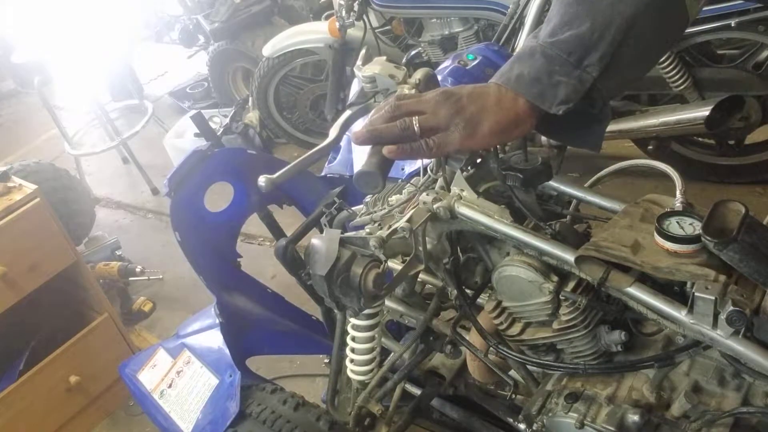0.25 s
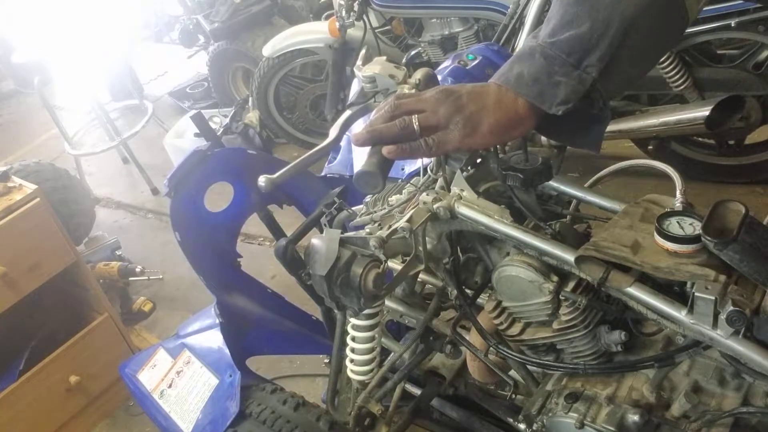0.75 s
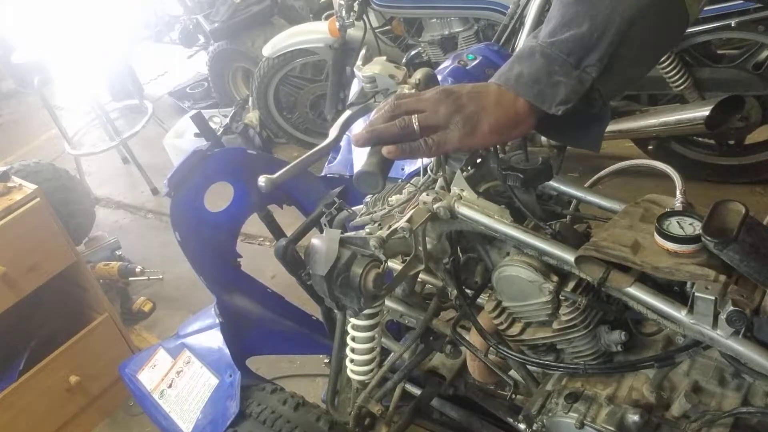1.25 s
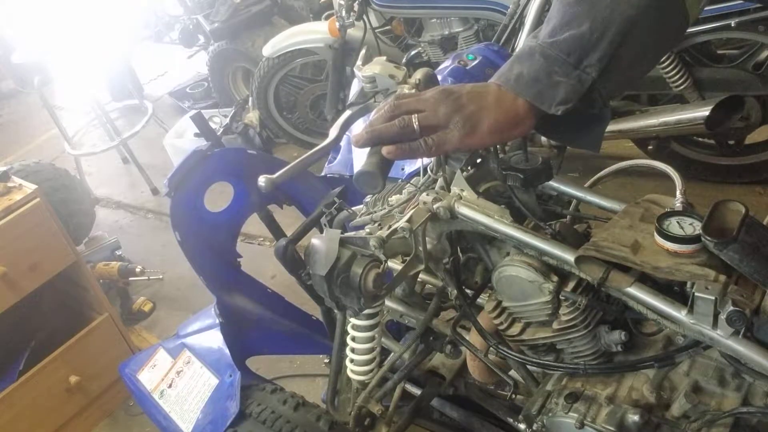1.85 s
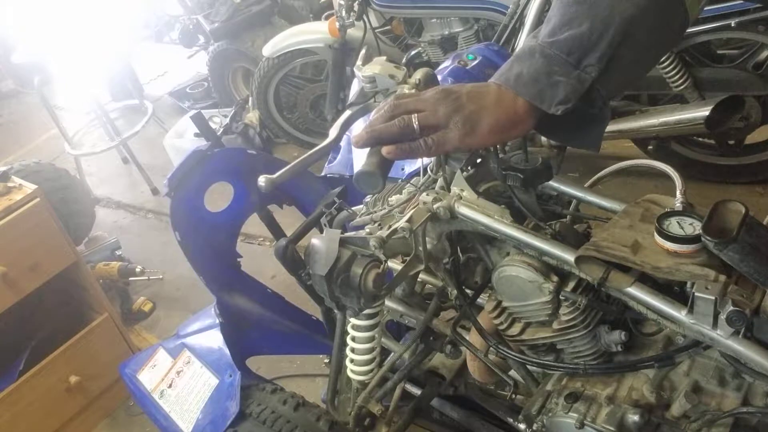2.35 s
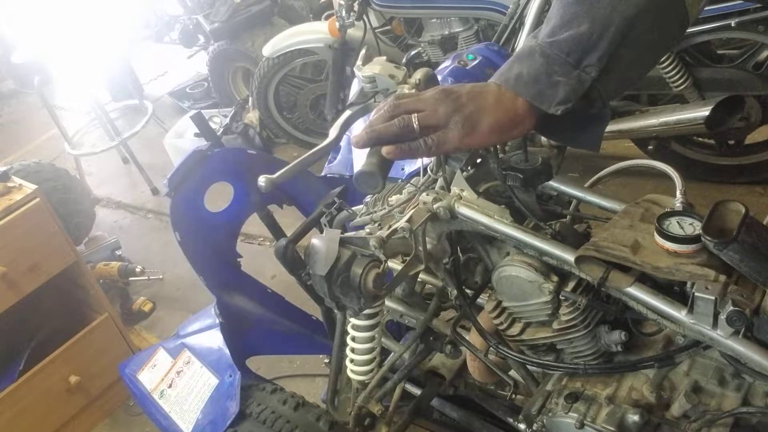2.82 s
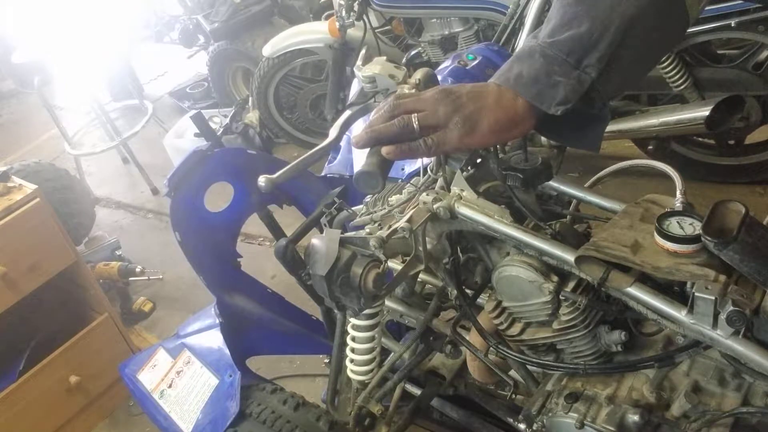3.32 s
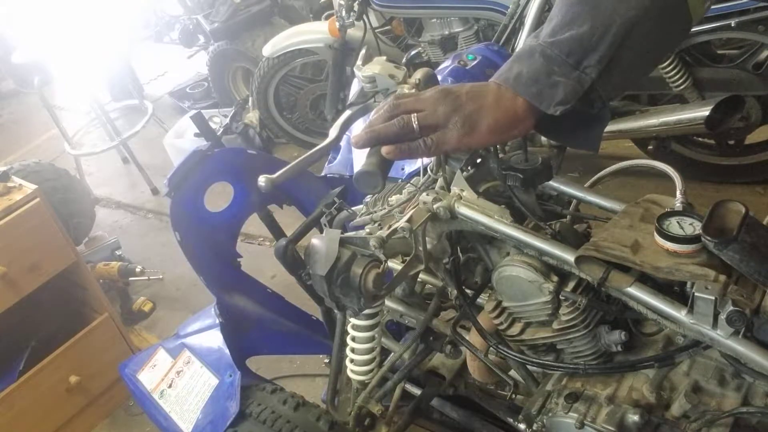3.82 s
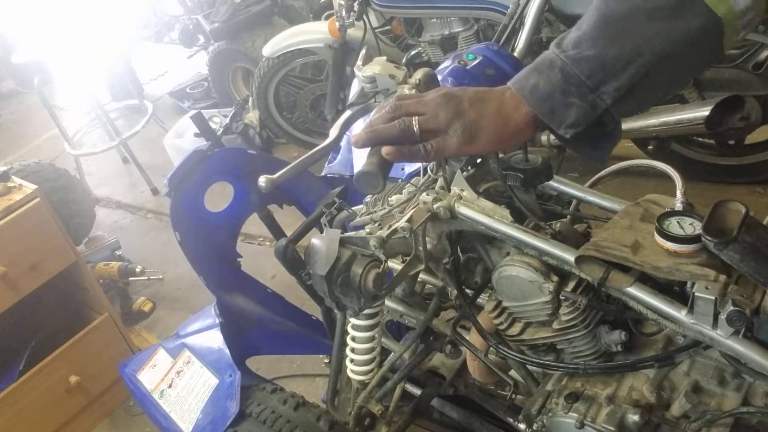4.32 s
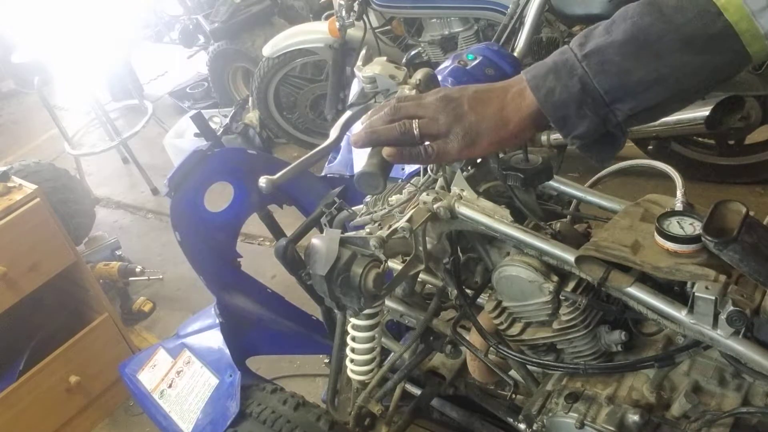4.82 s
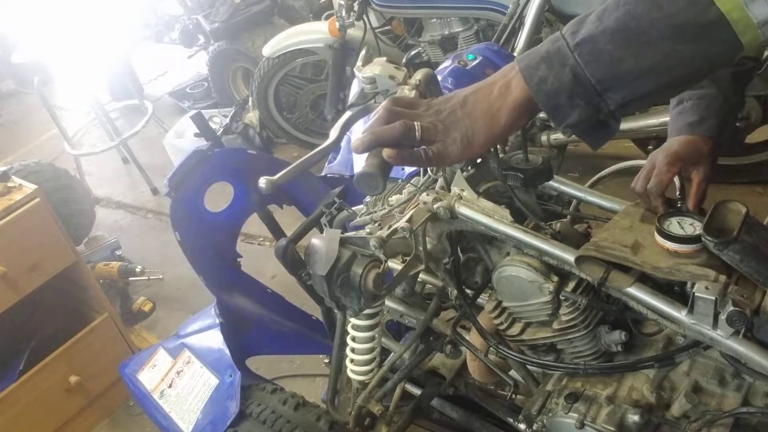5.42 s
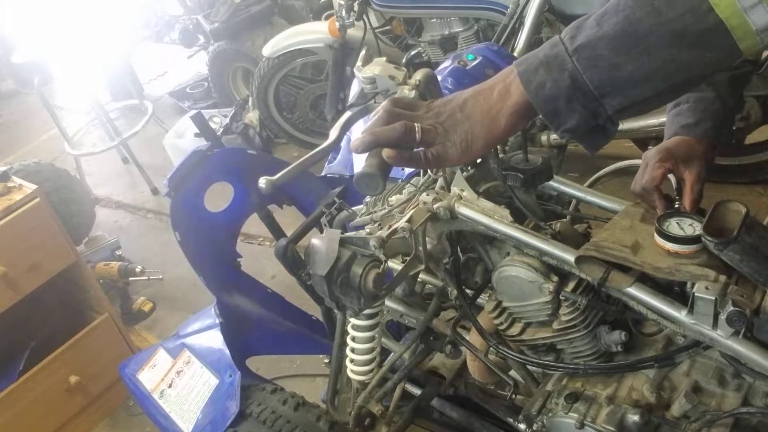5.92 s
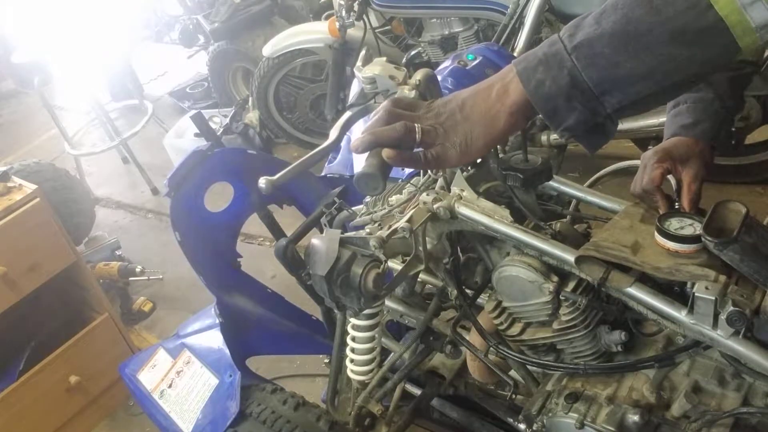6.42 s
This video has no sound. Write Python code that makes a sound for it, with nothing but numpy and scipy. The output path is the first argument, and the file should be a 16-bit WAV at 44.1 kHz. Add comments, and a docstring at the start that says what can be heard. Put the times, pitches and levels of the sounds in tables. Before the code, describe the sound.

An electric starter cranks a single-cylinder engine in even, clattering, thumping pulses without firing, whirrs down and groans, then a gauge vents a short puff of air.

```python
"""Compression test in a workshop: an electric starter cranks a single-cylinder engine, with no firing.
A burst of cranking dies away in boom and ringing steel; a relay clacks and a long burst follows. In every cycle
the gears slam into load, the frame thumps at the top of compression and the drive rebounds and rattles.
The starter whirrs down, a last stroke groans, the gauge leaks in spurts and its valve vents the air in one puff.
Gears, contacts and air are shaped noise or blows through resonances; thumps and steel are decaying sines."""
import sys
import numpy as np
from scipy import signal
from scipy.fft import rfft, irfft, next_fast_len
from scipy.io import wavfile
from scipy.ndimage import map_coordinates

SR = 44100
rng = np.random.default_rng(int(sys.argv[2]) if len(sys.argv) > 2 else 0)


def dump_mix(stems):
    """Bounce the given channels to the path in sys.argv[1] as a 16-bit WAV at rate SR."""
    frames = np.atleast_2d(stems).T  # one column per channel
    limited = np.clip(frames, -1, 1)  # hard clip at full scale
    pcm = np.round(limited * 32767).astype(np.int16)
    wavfile.write(sys.argv[1], SR, pcm)


N = 293706
T = np.arange(N) / SR


def amp(db):
    """Decibels to gain."""
    return 10 ** (np.asarray(db) / 20)


def unit(x):
    """Scale to rms 1."""
    return x / np.sqrt(np.mean(np.abs(x) ** 2) + 1e-20)


def along(points, hz):
    """Read (frequency [Hz], value) points on a log frequency axis."""
    f, v = np.transpose(points)
    return np.interp(np.log(hz + 1), np.log(f + 1), v)


def wobble(rate_hz):
    """Smooth random curve with rate_hz knots a second."""
    knots = rng.standard_normal(int(N * rate_hz / SR) + 4)
    return map_coordinates(knots, [T * rate_hz])


def burst(t, rise_s, length_s, t60_s):
    """Envelope that rises from t = 0, holds until length_s and dies away."""
    attack = np.clip(t / (rise_s + 1e-6), 0, 1)
    return attack * amp(-60 * np.maximum(t - length_s, 0) / t60_s)


def running_out(start_s, length_s):
    """Share left of something that drains evenly from start_s on."""
    return np.clip(1 - (T - start_s) / length_s, 0, 1)


def filtered(x, response):
    """Filter x by a complex response of frequency."""
    size = 2 * next_fast_len((N + SR) // 2)
    spectrum = rfft(x, size) * response(np.fft.rfftfreq(size, 1 / SR))
    return irfft(spectrum, size)[..., :x.shape[-1]]


def colour(x, points, peaks=()):
    """Minimum-phase filter of unit power gain: a broad spectrum with resonances standing out of it."""
    def response(hz):
        db = along(points, hz)
        for centre_hz, width_hz, lift_db in peaks:
            db = db + lift_db / (1 + (2 * (hz - centre_hz) / width_hz) ** 2)
        # fold the cepstrum to make the filter causal
        cepstrum = irfft(np.log(amp(db)))
        half = len(cepstrum) // 2
        cepstrum[1:half] *= 2
        cepstrum[half + 1:] = 0
        return unit(np.exp(rfft(cepstrum)))
    return filtered(x, response)


def ring(x, modes):
    """Damped resonances, together of unit power gain; a wider mode dies sooner."""
    t = T[:SR // 2]
    tone = 0
    for hz, width_hz, db in modes:
        decay = np.exp(-np.pi * width_hz * t)
        tone = tone + amp(db) * width_hz * decay * np.sin(2 * np.pi * (hz * t + rng.random()))
    return signal.fftconvolve(x, tone / np.linalg.norm(tone))[:N]


def narrow(hz, width_hz):
    """Noise of rms 1 in a narrow band around a steady or gliding pitch."""
    envelope = wobble(width_hz) + 1j * wobble(width_hz)
    carrier = np.exp(2j * np.pi * np.cumsum(hz * np.ones(N)) / SR)
    return unit((envelope * carrier).real)


def impulses(times_s, sizes):
    """Single-sample blows."""
    index = np.clip(np.round(times_s * SR).astype(int), 0, N - 1)
    return np.bincount(index, sizes, N)


def teeth(rate_hz, scatter_db, rub):
    """Uneven random tooth contacts over sliding noise, rms 1."""
    size_db = scatter_db * np.clip(rng.standard_normal(N), -2, 2)
    hits = (rng.random(N) < rate_hz / SR) * amp(size_db) * rng.choice([-1, 1], N)
    return unit(unit(hits) + rub * rng.standard_normal(N))


# likeness of a diffuse field at both ports: (frequency [Hz], likeness [0-1])
PORT_LIKENESS = [(60, 0.6), (150, .95), (280, .88), (520, 0.7), (1000, .05), (3000, 0.02)]


def pair(noises):
    """Two unrelated signals as a diffuse field at two close ports, most alike in the bass."""
    def mid_side(hz):
        turn = np.arccos(np.clip(along(PORT_LIKENESS, hz), -1, 1)) / 2
        return np.array([np.cos(turn), np.sin(turn)])
    mid, side = filtered(noises, mid_side)
    return np.array([mid + side, mid - side])


# background spectrum: (frequency [Hz], relative level [dB])
BACKGROUND_COLOUR = [(13, -35), (22, -11.5), (44, -7), (66, -1), (133, -15.5), (190, -25), (408, -35.5),
                     (1010, -37.5), (3430, -39), (4050, -27), (4390, -52.5), (5170, -45.5), (5770, -38),
                     (7580, -42), (15000, -42)]


def background(level_db=-63.5):
    """Low rumble: steady coloured noise, diffuse at the two ports."""
    return amp(level_db) * unit(pair(colour(rng.standard_normal((2, N)), BACKGROUND_COLOUR)))


# engine cycles: (top of compression [s], relative strength of slam [dB], rebound [dB], overrun rattle [dB])
CYCLES = [(0.625, -4.5, -7.5, 1.5), (0.9264, 0, 1, -.5), (1.2453, -1.5, -.5, -.5), (1.562, -1, 0, 1),
          (1.8801, -0.5, -2, 0), (2.197, -0.5, -0.5, 1), (2.5152, 0, -1, 1), (2.835, 0, 1.5, 1),
          (3.1553, -0.5, 0.5, 2), (3.4742, 0, -0.5, -.5), (3.7927, -.5, -1, -1), (4.1115, -1.5, 2, -0.5),
          (4.4304, -1.5, 0, -1.5)]
EARLIER_TOP_S = -.05  # last compression of the earlier burst, still booming
THUMP_DB, THUMP_RISE_DB_PER_S, THUMP_FALL_DB_PER_S = -24, 400.5, 350.5
# pitch glides up as the piston goes over the top
THUMP_LOW_HZ, THUMP_HIGH_HZ, THUMP_GLIDE_S, THUMP_LEAD_S = 46.5, 72.1, 0.015, .008
BOOM_DB, BOOM_SWELL_S, BOOM_T60_S = -34.5, .06, .55


def thumps():
    """Each compression rocks the frame on its springs, and the bass hangs on in the room."""
    t = np.arange(-SR // 12, SR // 4) / SR
    glide = (1 + np.tanh((t + THUMP_LEAD_S) / THUMP_GLIDE_S)) / 2
    hz = THUMP_LOW_HZ + (THUMP_HIGH_HZ - THUMP_LOW_HZ) * glide
    rock = amp(THUMP_DB + np.minimum(THUMP_RISE_DB_PER_S * t, -THUMP_FALL_DB_PER_S * t))
    boom = amp(BOOM_DB) * burst(t, BOOM_SWELL_S, BOOM_SWELL_S, BOOM_T60_S)
    turns = np.cumsum(hz) / SR
    turns = turns - np.interp(0, t, turns)
    swing = -np.hypot(rock, boom) * np.cos(2 * np.pi * turns) * signal.windows.tukey(len(t), .1)
    tops_s = [EARLIER_TOP_S] + [row[0] for row in CYCLES]
    return sum(np.interp(T - top_s, t, swing) for top_s in tops_s)


# steel part still singing from the earlier burst: (frequency [Hz], relative level [dB], T60 [s])
STEEL_MODES = [(915, -57.5, 2.4), (2853, -70.5, 1.6)]


def steel():
    """A steel part rings out as decaying sines."""
    return sum(amp(db - 60 * T / t60_s) * np.sin(2 * np.pi * hz * T) for hz, db, t60_s in STEEL_MODES)


# gear loads in a cycle, slam, rebound, overrun: (time from top [s], rise [s], hold [s], T60 [s],
# relative clatter [dB], clutch ring [dB], idler ring [dB])
LOADS = [(-.118, .003, 0.021, 0.15, -17.5, -25.5, -21.5), (0.0122, 0.0016, .009, .11, -19.5, -25, -29),
         (0.065, .007, .053, .08, -23.5, -29, -25.5)]
RING_FALL = 2.6  # clutch and idler ring fade this many times faster than the clatter
RUN_DB, RUN_RING_DB = -31, -53.5  # steady clatter and ring between loads, relative
DRIVE_S, DRIVE_RISE_S, DRIVE_HOLD_S, DRIVE_T60_S = .45, .08, 4.05, .15


def loads():
    """Strength of clatter, clutch ring and idler ring: a steady drive with three loads in every cycle."""
    cycles = np.array(CYCLES)
    cycle = np.searchsorted(cycles[:, 0] + LOADS[0][0], T) - 1
    cycle = np.clip(cycle, 0, len(cycles) - 1)
    drive = burst(T - DRIVE_S, DRIVE_RISE_S, DRIVE_HOLD_S, DRIVE_T60_S)
    power = (amp([[RUN_DB], [RUN_RING_DB], [RUN_RING_DB]]) * drive) ** 2
    for (delay_s, rise_s, hold_s, t60_s, *parts_db), strength_db in zip(LOADS, cycles[:, 1:].T):
        t = T - cycles[cycle, 0] - delay_s
        strength = amp(strength_db)[cycle]
        clatter = burst(t, rise_s, rise_s + hold_s, t60_s)
        ringing = burst(t, rise_s, rise_s + hold_s, t60_s / RING_FALL)
        shapes = np.array([clatter, ringing, ringing])
        power = power + (amp(parts_db)[:, None] * strength * shapes) ** 2
    return np.sqrt(power)


# unloaded gears spinning up or coasting: (time [s], length [s], relative clatter [dB], clutch ring [dB])
SURGES = [(-.02, 0.076, -23.5, -42), (0.361, .036, -35, -52), (.394, 0.062, -25.5, -38),
          (0.471, .048, -21, -25.5), (4.668, 0.036, -29, -46), (4.805, 0.038, -39.5, -50.5)]
SURGE_RISE_S, SURGE_T60_S = 0.011, 0.15
# broad colour of the engine: (frequency [Hz], relative level [dB])
CASE_COLOUR = [(53, -33.5), (90, -16.5), (170, -14.5), (365, -6), (490, -10), (800, -4), (1070, -1.5),
               (1350, -8), (1650, -2.5), (2230, -8), (2600, -4), (3900, -10), (4500, -13.5), (5500, -21),
               (7800, -18), (8660, -25.5), (15500, -30.5)]
# resonances of cases and fins: (frequency [Hz], width [Hz], lift above broad colour [dB])
FIN_MODES = [(157.3, 5.8, 9), (200.5, 14, 6), (375, 69, 3.5), (693, 14, 2.5), (750, 21, 1.5),
             (782, 14, 0.5), (896, 26, 3), (1022, 16, 1), (1120, 21, -0.5), (1150, 33, 2.5),
             (1541, 35, 5.5), (1640, 30, 0), (1668, 36, 3), (1860, 16, 2.5), (1964, 9, 5.5), (2068, 78, 4),
             (2620, 9.4, 0.5), (2614, 16, 6), (2820, 8, -2.5), (3022, 13, 0.5), (2985, 26, 3.5),
             (3820, 180, 2.5), (3790, 35, 3.5), (4260, 30, 1.5), (6270, 33, 7)]
# steel starter clutch: (frequency [Hz], width [Hz], relative level [dB])
CLUTCH_MODES = [(6450, 63, -2.5), (7621, 160, -2), (7548, 163, -2), (7840, 300, -11.5)]
# starter idler gear: (frequency [Hz], width [Hz], relative level [dB])
IDLER_MODES = [(1040, 37, -3), (1102, 22, -4.5), (1154, 24, -8.5), (1643, 25, -6.5), (2414, 16, -6.5)]
# frame trembling as the engine turns: (frequency [Hz], relative level [dB])
SHAKE_COLOUR = [(15, -12), (30, -9.5), (60, 1), (110, 1.5), (180, -19), (400, -64)]


def gears(case_db=2.5, free_idler_db=-12, shake_db=-22):
    """The gear train clatters as hard as it is loaded; cases, idler gear and clutch ring with it."""
    on_teeth, on_clutch, on_idler = loads()
    free, free_clutch = sum(amp(parts_db)[:, None] * burst(T - s, SURGE_RISE_S, length_s, SURGE_T60_S)
                            for s, length_s, *parts_db in SURGES)
    effort = np.hypot(on_teeth * amp(wobble(40) / 2), free)
    clatter = colour(effort * teeth(rate_hz=900, scatter_db=3.5, rub=0.51), CASE_COLOUR, FIN_MODES)
    rollers = teeth(rate_hz=700, scatter_db=2.5, rub=.35)
    clutch = ring((on_clutch + free_clutch) * rollers, CLUTCH_MODES)
    idler_teeth = teeth(rate_hz=530, scatter_db=4.0, rub=0.38)
    idler = ring((on_idler + amp(free_idler_db) * free) * idler_teeth, IDLER_MODES)
    shake = colour(effort * rng.standard_normal(N), SHAKE_COLOUR)
    return amp(case_db) * clatter + clutch + idler + amp(shake_db) * shake


# gear lash and valve contacts of every cycle: (time from top [s], relative knock [dB], relative tick [dB])
CONTACTS = [(-.1145, 5, -17.5), (-.105, -2, -21.5), (-.097, 5.5, -17.5), (-.087, -4, -14), (-.042, -11, -5),
            (0.017, -4.5, -11), (0.056, -18, -5), (.076, 3.5, -5.5), (.098, -1, -6.5), (.122, 0, -5)]
# single clacks, starter relay first, then loose parts: (time [s], relative knock [dB], relative tick [dB])
CLACKS = [(.365, -4, -8), (.59, -25.5, -3), (0.669, -2, -1)]
# knock spectrum: (frequency [Hz], relative level [dB])
KNOCK_COLOUR = [(60, -21), (150, -16), (360, -1.5), (520, -7), (1050, 8.5), (2000, 0), (4000, 11.5),
                (9000, -38.5)]
# tick spectrum: (frequency [Hz], relative level [dB])
TICK_COLOUR = [(300, -21.5), (1500, -9), (3500, 9.5), (6000, 12), (11000, 8.5), (16000, -26.5)]


def knocks(knock_db=-1, tick_db=-1, jitter_s=.0008, scatter_db=1.9, tick_t60_s=.025):
    """Gear lash and valves strike near set times from each top, as hard as their load; clacks stand alone."""
    cycles = np.array(CYCLES)
    delay_s, heavy_db, light_db = np.transpose(CONTACTS)
    shape = (len(cycles), len(delay_s))
    times_s = (cycles[:, :1] + delay_s + jitter_s * rng.standard_normal(shape)).ravel()
    load = np.maximum(np.searchsorted(np.array(LOADS)[:, 0], delay_s), 1)
    force_db = cycles[:, load] + scatter_db * rng.standard_normal(shape)
    clack_s, clack_db, click_db = np.transpose(CLACKS)
    blows = impulses(times_s, amp(heavy_db + force_db + knock_db).ravel())
    blows = blows + impulses(clack_s, amp(clack_db))
    ticks = impulses(times_s, amp(light_db + force_db + tick_db).ravel())
    ticks = ticks + impulses(clack_s, amp(click_db))
    t = T[:SR // 20]
    crack = rng.standard_normal(len(t)) * amp(-60 * t / tick_t60_s)
    cracks = signal.fftconvolve(ticks, crack / np.linalg.norm(crack))[:N]
    return colour(blows, KNOCK_COLOUR, FIN_MODES) + colour(cracks, TICK_COLOUR)


# colour of the starter whirr: (frequency [Hz], relative level [dB])
BRUSH_COLOUR = [(200, -26.5), (550, -6), (850, -4.5), (1350, -0.5), (2000, 0.5), (2600, -11), (3400, -7),
                (3900, -3.5), (4400, -16.5), (8000, -27.5), (15000, -35)]
RUNDOWN_S, RUNDOWN_LENGTH_S, WHIRR_RISE_S = 4.547, 0.57, 0.07
WHIRR_DB, WHIRR_POWER = -32.5, 0.83


def rundown():
    """The undriven starter slows evenly; the level of its whirr goes with a power of its speed."""
    speed = running_out(RUNDOWN_S, RUNDOWN_LENGTH_S)
    attack = np.clip((T - RUNDOWN_S) / WHIRR_RISE_S, 0, 1)
    whirr = colour(teeth(rate_hz=700, scatter_db=3.5, rub=0.76), BRUSH_COLOUR)
    return amp(WHIRR_DB) * attack * speed ** WHIRR_POWER * whirr


# groan resonances: (frequency [Hz], width [Hz], relative level [dB])
GROAN_MODES = [(202, 24, -8), (362, 38, -5), (547, 75, -13.5)]
GROAN_S, GROAN_RISE_S, GROAN_HOLD_S, GROAN_T60_S, GROAN_DB = 4.705, 0.027, 0.043, .16, -30


def groan():
    """The last slow stroke groans: a noise burst through low resonances."""
    push = amp(GROAN_DB) * burst(T - GROAN_S, GROAN_RISE_S, GROAN_HOLD_S, GROAN_T60_S)
    return ring(push * rng.standard_normal(N), GROAN_MODES)


# engine settling and a touch on the gauge: (time [s], frequency [Hz], width [Hz], relative level [dB])
TAPS = [(5.165, 1000, 700, -52), (5.538, 590, 400, -70)]
TAP_RISE_S, TAP_T60_S = .006, 0.067


def taps():
    """Soft, dull knocks: short bursts of band noise without a ring."""
    return sum(amp(db) * burst(T - s, TAP_RISE_S, TAP_RISE_S, TAP_T60_S) * narrow(hz, width_hz)
               for s, hz, width_hz, db in TAPS)


# spurts of the leak: (time [s], length [s], relative whistle [dB], relative fizz [dB])
SPURTS = [(5.217, .12, -85, -74), (5.37, .09, -73.5, -78), (5.58, 0.098, -73.5, -77.5), (5.7, .1, -80, -75),
          (5.81, .1, -73, -79.5), (6.295, .4, -69.5, -100)]
# fizz of the leak: (frequency [Hz], relative level [dB])
FIZZ_COLOUR = [(3000, -23), (4600, -6), (5140, 7), (5600, -5), (6240, -1.5), (7500, -18), (12000, -23.5)]
SPURT_RISE_S, SPURT_T60_S = 0.035, .25
WHISTLE_HZ, SAG_S, SAG_HZ_PER_S = 4100, 6.33, 1400  # the whistle sinks once the gauge is empty


def leak(flutter_db=5, skirt_db=-6):
    """Trapped air whistles and fizzes in fluttering spurts through a small leak."""
    hz = WHISTLE_HZ - SAG_HZ_PER_S * np.maximum(T - SAG_S, 0)
    whistle = narrow(hz, width_hz=320) + amp(skirt_db) * narrow(hz, width_hz=1800)
    fizz = colour(rng.standard_normal(N), FIZZ_COLOUR)
    air = 0
    for s, length_s, whistle_db, fizz_db in SPURTS:
        spurt = burst(T - s, SPURT_RISE_S, length_s, SPURT_T60_S)
        air = air + spurt * (amp(whistle_db) * whistle + amp(fizz_db) * fizz)
    return air * amp(flutter_db * wobble(25) - 0.5)


# jet spectrum: (frequency [Hz], relative level [dB])
JET_COLOUR = [(59, -60), (100, -27), (370, -12), (447, -16.5), (508, -8), (1160, -9.5), (1260, -11.5),
              (1800, -6.5), (2630, -9), (5400, -2), (9340, -6.5), (12300, -2.5), (15500, -7)]
RELEASE_S, RELEASE_RISE_S, EMPTY_S, JET_DB, JET_POWER = 5.957, .008, .37, -26, 1.54
POP_DB, POP_T60_S, CRACK_LEAD_S, CRACK_DB = -24, 0.057, .02, -41


def gauge(dulling_per_s=2.5):
    """The valve cracks open, pops and vents; pressure drains evenly, the jet goes with its power and dulls."""
    t = T - RELEASE_S
    pressure = running_out(RELEASE_S, EMPTY_S)
    flow = amp(JET_DB) * np.clip(t / RELEASE_RISE_S, 0, 1) * pressure ** JET_POWER
    pop = amp(POP_DB) * burst(t, RELEASE_RISE_S, RELEASE_RISE_S, POP_T60_S)
    crack = amp(CRACK_DB) * burst(t + CRACK_LEAD_S, CRACK_LEAD_S, CRACK_LEAD_S, POP_T60_S)
    jet = (np.hypot(flow, pop) + crack) * colour(rng.standard_normal(N), JET_COLOUR)
    treble = filtered(jet, lambda hz: hz ** 2 / (hz ** 2 + 7000 ** 2))
    # treble starts lifted and ends cut
    return jet + (np.exp(-dulling_per_s * np.maximum(t, 0)) - .77) * treble


# workshop reverberation: (frequency [Hz], T60 [s])
ROOM_T60 = [(100, 0.55), (260, 0.7), (700, 0.44), (1840, 0.46), (4850, 0.35), (12800, 0.47)]


def echoes(early_db):
    """Two-channel response: quick echoes off nearby parts, then the room's tail."""
    hz, t, z = signal.stft(rng.standard_normal((2, SR * 3 // 5)), SR, nperseg=256)
    decay = amp(-60 * t / along(ROOM_T60, hz)[:, None])
    build_up = 1 - np.exp(-t / 0.0051)
    tail = signal.istft(z * decay * build_up, SR, nperseg=256)[1]
    early = rng.standard_normal(tail.shape) * amp(-60 * T[:tail.shape[1]] / 0.045)
    return tail / np.linalg.norm(tail[0]) + amp(early_db) * early / np.linalg.norm(early[0])


def workshop(x, direct_db, early_db, lead_s, block=14000):
    """Direct sound (left port ahead by lead_s) and echoes drawn anew for each block of samples."""
    # echoes are redrawn for each block, so random peaks average out and the typed resonances set the colour
    wet = np.zeros((2, 2 * N))
    for start in range(0, N, block):
        answer = signal.fftconvolve(x[None, start:start + block], echoes(early_db), axes=1)
        wet[:, start:start + answer.shape[1]] += answer
    ports = np.array([[1], [-1]])
    direct = filtered(x, lambda hz: np.exp(1j * np.pi * hz * lead_s * ports))
    total = np.sqrt(1 + amp(direct_db) ** 2 + amp(early_db) ** 2)
    return (amp(direct_db) * direct + pair(wet[:, :N])) / total


def scene():
    """Engine and gauge in the workshop, with frame thumps and a low background rumble."""
    machine = steel() + gears() + knocks() + rundown() + groan()
    engine = workshop(machine, direct_db=-4.0, early_db=-0.5, lead_s=.00009)
    # one block: a single draw of echoes
    air = workshop(taps() + leak() + gauge(), direct_db=-7.5, early_db=-10.5, lead_s=.00013, block=N)
    return background() + thumps() + engine + air


# port sensitivity: (frequency [Hz], left minus right [dB])
PORT_TILT = [(60, -2), (150, -0.5), (500, -0.7), (1000, -2.5), (2000, -2), (4000, -0.5), (8000, -3),
             (13000, -3.5)]
TOP_HZ = 15800


def record(dry):
    """The right port is a little more sensitive; nothing is kept from TOP_HZ up."""
    halves = np.array([[.5], [-.5]])
    return filtered(dry, lambda hz: amp(along(PORT_TILT, hz) * halves) * (hz < TOP_HZ))


dry = scene()
out = record(dry)
dump_mix(out)
```